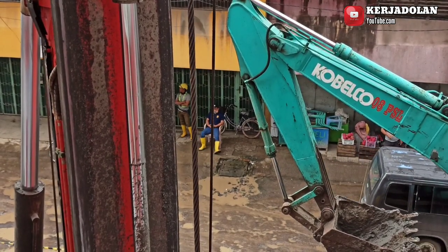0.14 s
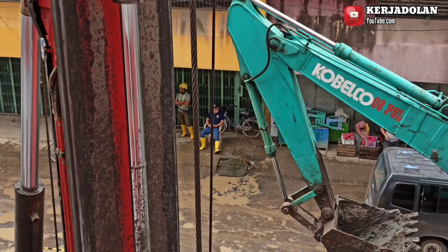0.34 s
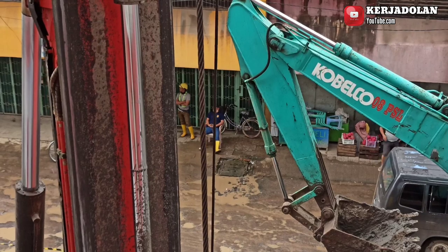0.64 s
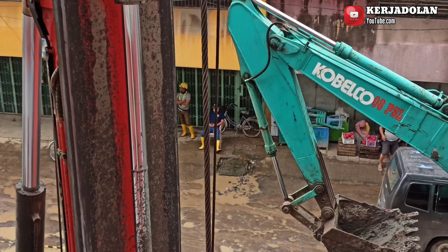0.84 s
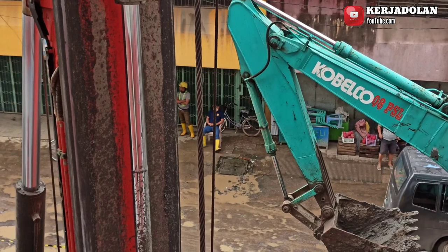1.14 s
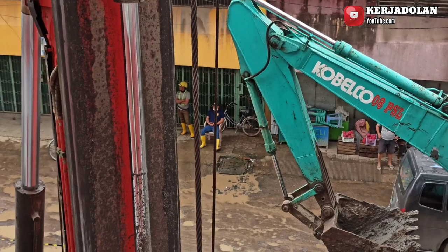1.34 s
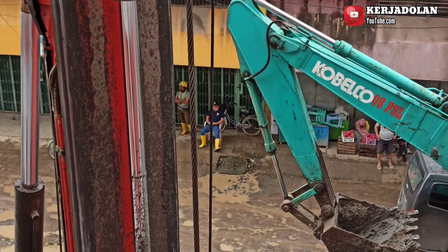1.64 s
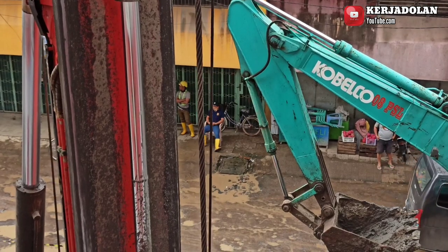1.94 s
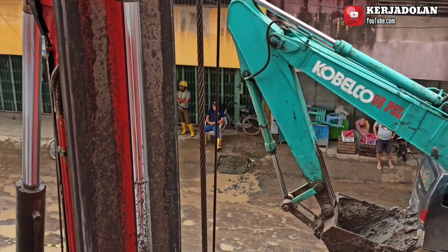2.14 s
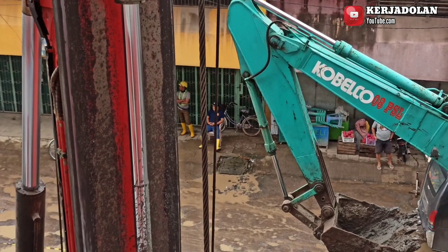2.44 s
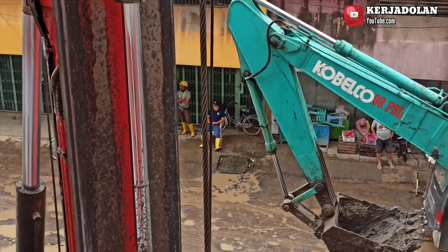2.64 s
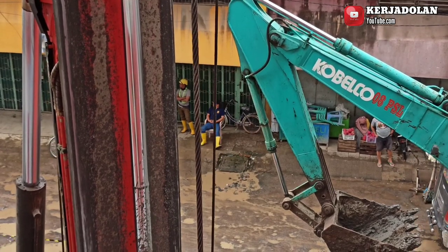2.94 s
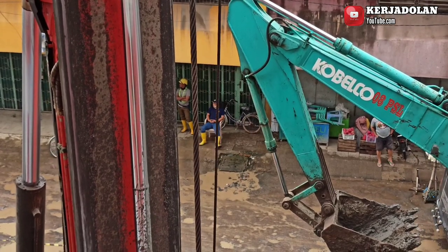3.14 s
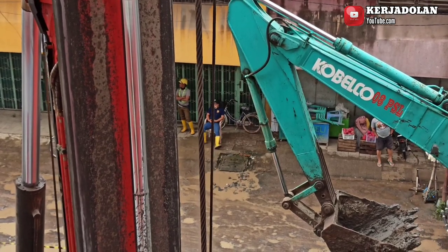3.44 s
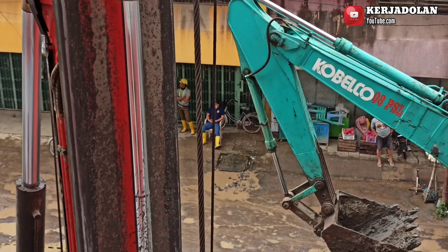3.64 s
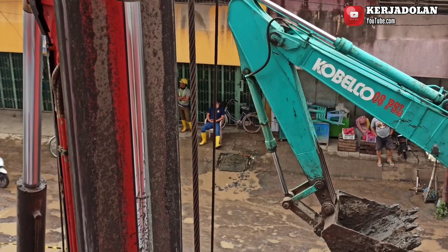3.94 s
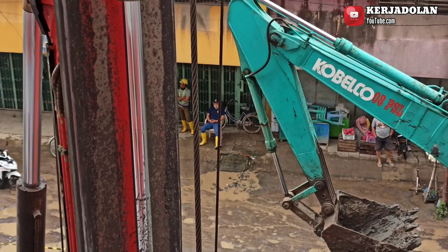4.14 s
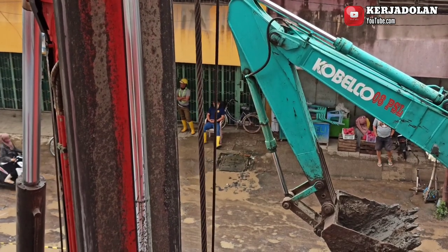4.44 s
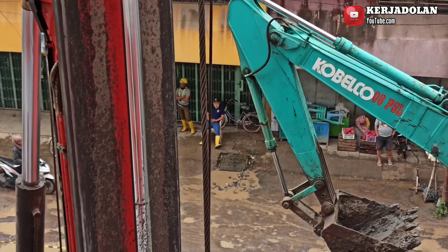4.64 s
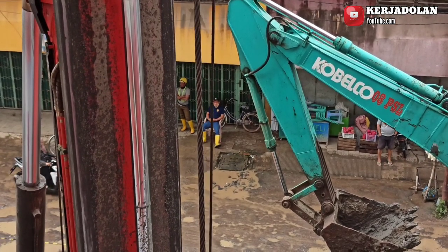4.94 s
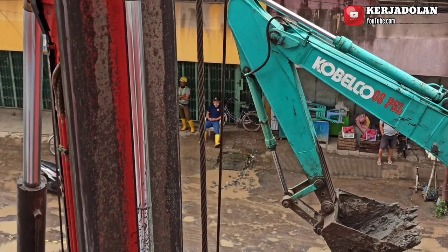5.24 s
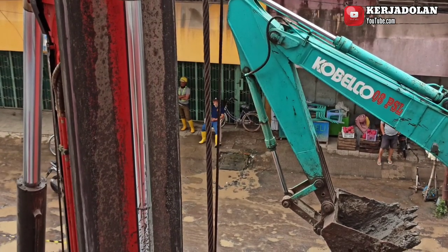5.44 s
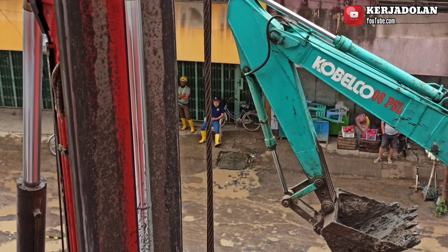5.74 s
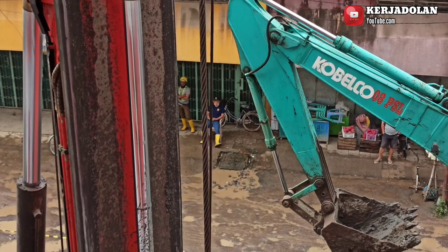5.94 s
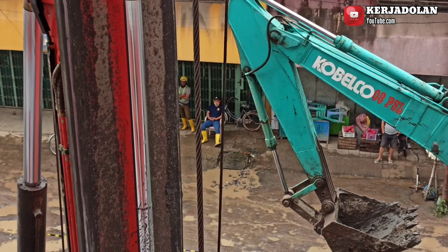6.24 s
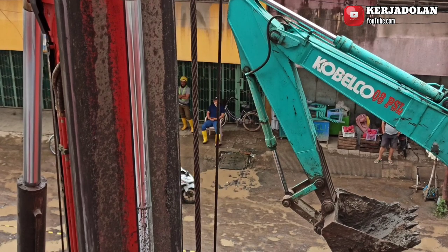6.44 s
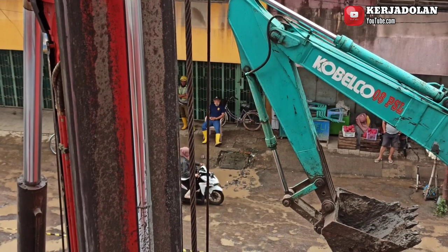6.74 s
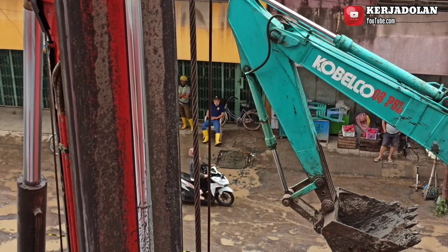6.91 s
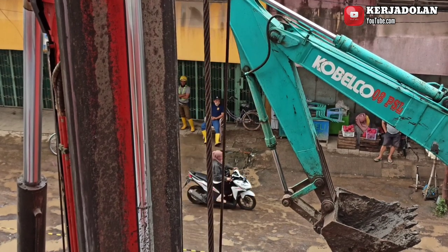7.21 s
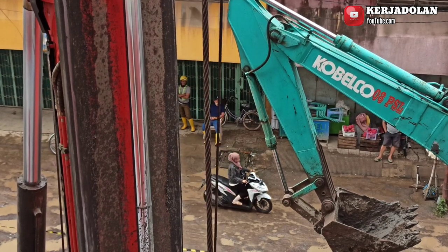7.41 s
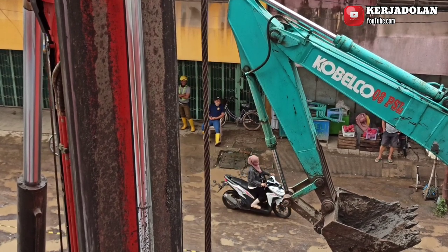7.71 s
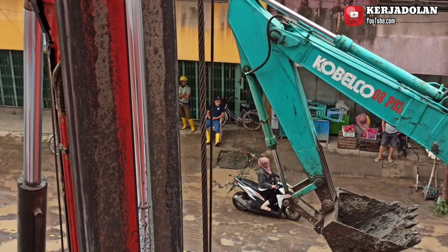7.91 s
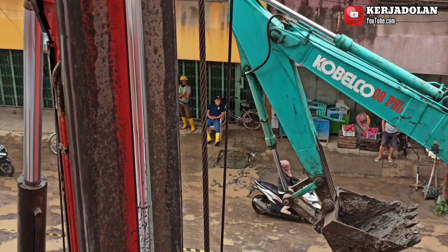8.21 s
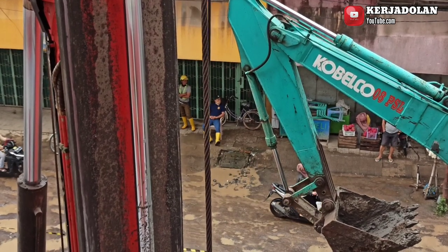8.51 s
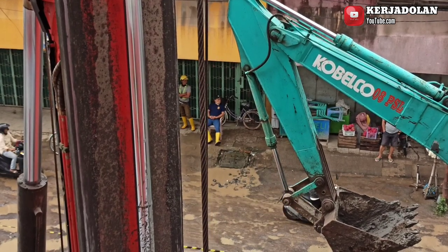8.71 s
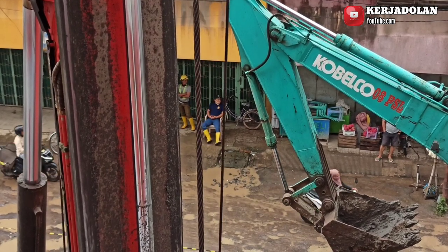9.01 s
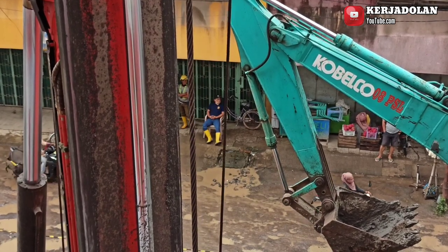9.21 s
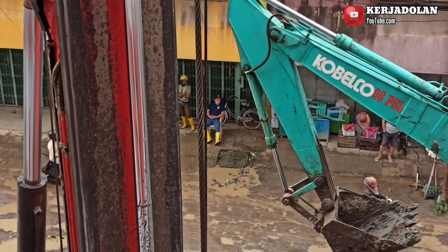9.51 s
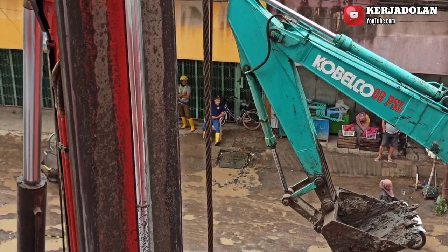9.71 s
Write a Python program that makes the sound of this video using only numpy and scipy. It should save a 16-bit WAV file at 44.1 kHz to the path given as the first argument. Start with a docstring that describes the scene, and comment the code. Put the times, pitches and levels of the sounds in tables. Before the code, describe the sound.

Close outdoor building site: a drilling rig runs without pause, a rough diesel hum and broad hissing roar under a wavering mechanical whine. Loose steel links chink, mostly in the first three seconds. The whine sags in pitch by four seconds, swells strongly at moments, then gradually climbs while engines drone past. The nearby microphone sounds dense and compressed, with thin deep bass.

```python
"""A drilling rig works close by on a building site. At first its shaft turns fast: the drive whines in
multiples of the shaft speed over a diesel hum and a roar of filtered noise, two engines drone past on
the road, and steel links chink, most often in the first three seconds. By four seconds the shaft sags
under load, with the whine swelling strongly at times; then it slowly recovers while more engines pass.
All along, a gain control turns the loud moments down."""
import sys
import numpy as np
from scipy import signal
from scipy.io import wavfile
from scipy.ndimage import uniform_filter1d

SR = 44100
rng = np.random.default_rng(int(sys.argv[2]) if len(sys.argv) > 2 else 0)


def bounce(signal):
    """Save signal as a 16-bit WAV file at the path given by the first command-line argument."""
    frames = np.transpose(np.atleast_2d(signal))
    limited = np.clip(frames, -1, 1)
    pcm = np.round(limited * 32767).astype(np.int16)
    wavfile.write(sys.argv[1], SR, pcm)


N = 434826  # length in samples


def gain_of(db):
    """Turns decibels into an amplitude factor."""
    return 10 ** (np.asarray(db) / 20)


def evened(x):
    """Scales a signal to an rms (average size) of 1."""
    return x / np.sqrt(np.mean(abs(x) ** 2) + 1e-20)


def read(points, hz):
    """Reads a spectrum table along a logarithmic frequency axis."""
    f, value = np.transpose(points)
    return np.interp(np.log(hz + 1), np.log(f + 1), value)


def played(rows, t):
    """Reads each column of a time table at the times t."""
    s, *columns = np.transpose(rows)
    return [np.interp(t, s, column) for column in columns]


def drift(hz):
    """Complex noise of rms 1, low-passed at hz so that it wanders slowly."""
    hold = 64  # each value lasts this many samples
    steps = N // hold + 2
    z = rng.standard_normal(steps) + 1j * rng.standard_normal(steps)
    z = evened(signal.lfilter([1], [1, -np.exp(-2 * np.pi * hz * hold / SR)], z))
    return np.repeat(z, hold)[:N]


def wander(hz, smooth):
    """A real drift of rms 1, averaged over a number of samples to round off its steps."""
    return evened(uniform_filter1d(drift(hz).real, smooth))


def tone(turns, rough, hz, apart=.3):
    """A tone for the left and right ports; the rough share wavers, and an extra part is opposite at each."""
    rough = np.clip(rough, 0, 1)
    spin = np.sqrt(2) * np.exp(2j * np.pi * turns)
    shared = ((np.sqrt(1 - rough) + np.sqrt(rough) * drift(hz)) * spin).real
    return shared + [[apart], [-apart]] * (drift(hz) * spin).real


# speed of the drive shaft as it sags under load and recovers: (t/s, turns per s)
SHAFT = [(0.0, 37.43), (0.35, 36.8), (0.8, 36.8), (1.2, 37.0), (2.0, 35.7), (2.6, 35.4), (2.9, 34.7),
         (3.32, 34.65), (3.45, 33.3), (3.6, 32.2), (3.8, 31.8), (3.9, 31.15), (4.3, 30.75), (4.5, 31.35),
         (4.7, 31.45), (5.0, 31.15), (5.6, 31.48), (7.08, 31.75), (7.25, 32.3), (7.6, 32.75), (8.0, 32.84),
         (8.12, 33.5), (8.45, 34.1), (8.7, 34.5), (8.92, 34.35), (9.1, 35.15), (9.5, 34.9), (9.86, 35.24)]
# whining orders, as multiples of the shaft speed
WHINE_ORDERS = 11, 11.5, 21, 22, 23, 24, 25
# basic level of each whining order: (level/dB)
WHINE_DB = -34.5, -39, -39.5, -33, -32, -33.5, -38
# housing resonances that change the orders sliding through them: (f/Hz, width/Hz, lift/dB)
HOUSING = [(437, 69, 7.5), (743, 51, 8.5), (830, 8.6, -1.5)]
# brief swells of one order: (t/s at the top, rise and fall time/s, order, level/dB)
SWELLS = [(0.26, 0.2, 11, -35), (0.52, 0.14, 11, -27), (0.91, .08, 11, -24), (.18, .1, 23, -28),
          (0.37, 0.12, 23, -25), (0.614, 0.18, 23, -23), (.1, .15, 11.5, -26), (.4, .15, 11.5, -28),
          (1.22, 0.2, 11.5, -25), (1.28, 0.2, 23, -26), (1.51, 0.18, 11, -27), (1.68, 0.3, 23, -24.5),
          (1.7, 0.064, 11, -21), (2.634, .15, 22, -32), (2.632, .12, 23, -26), (2.868, 0.091, 11, -22),
          (3.1, 0.14, 23, -26), (3.752, 0.12, 23, -28), (4.12, 0.16, 22, -16), (3.92, .2, 22, -17),
          (4.32, .12, 22, -25), (2.91, .22, 22, -23), (3.17, 0.21, 11, -25.5), (3.45, .15, 22, -27),
          (4.65, 0.21, 23, -17.5), (4.65, 0.36, 24, -24), (5.27, 0.33, 24, -22), (5.95, 0.27, 23, -23),
          (5.85, 0.28, 24, -24), (6.298, 0.18, 23, -14.5), (6.75, 0.081, 23, -32), (7.1, 0.24, 23, -22),
          (7.832, 0.18, 22, -19.5), (7.95, 0.15, 23, -21), (8.13, .09, 23, -24), (8.45, 0.15, 23, -25),
          (8.68, .1, 23, -25), (8.62, .12, 24, -27), (8.08, .1, 25, -29), (6.8, .15, 24, -28),
          (6.9, 0.092, 22, -25), (7.7, 0.15, 11, -29), (8.18, 0.36, 11, -28), (5.6, 0.2, 22, -27),
          (4.8, .12, 22, -29), (6.3, 0.13, 24, -30), (8.877, 0.12, 11, -27), (9.1, 0.12, 22, -21),
          (8.9, .1, 22, -25), (9.4, .15, 22, -27), (9.18, .12, 24, -28), (9.248, 0.094, 11, -34),
          (9.67, 0.13, 11.5, -29)]
# brief dips of the whine: (t/s at the lowest, fall and rise time/s, change/dB)
DIPS = [(4.05, .3, -4), (5.07, .08, -5), (5.7, .06, -2.5), (6.55, 0.09, -3), (7.47, 0.09, -2),
        (8.25, 0.12, -2)]
LOADED_TURNS_PER_S = 31.3  # shaft speed under load
WAVER_TURNS_PER_S = .045  # unsteadiness of the shaft speed
ROUGH_LOADED, ROUGH_PER_TURN = .32, .012  # the whine gets rougher as the shaft speeds up
FADING_DB, FADING_PER_S = 1.5, 5  # each order fades in and out by itself


def drive(t):
    """The shaft sounds at multiples (orders) of its speed; housing resonances lift some of them."""
    speed = played(SHAFT, t)[0] + WAVER_TURNS_PER_S * wander(3, 3000)
    turns = np.cumsum(speed) / SR
    rough = ROUGH_LOADED + ROUGH_PER_TURN * (speed - LOADED_TURNS_PER_S)
    dip_db = sum(db * np.exp(-((t - s) / length) ** 2) for s, length, db in DIPS)
    out = 0
    for k, db in zip(WHINE_ORDERS, WHINE_DB):
        lift_db = sum(top_db * np.exp(-.5 * ((k * speed - hz) / width) ** 2) for hz, width, top_db in HOUSING)
        size = gain_of(db + lift_db)
        for s, length, order, swell_db in SWELLS:
            if abs(order - k) < .25:  # this swell belongs to this order
                part = slice(max(round((s - length) * SR), 0), round((s + length) * SR))
                size[part] += gain_of(swell_db) * np.cos(np.pi / 2 * (t[part] - s) / length) ** 2
        size *= gain_of(dip_db + FADING_DB * wander(FADING_PER_S, 2000))
        out = out + size * tone(k * turns, rough, 6)
    return out


def gear_chatter(t):
    """Gear chatter smears a rapidly wavering band around the 23rd order of the shaft."""
    mesh_hz = 23 * played(SHAFT, t)[0]
    return gain_of(-23.0) * tone(np.cumsum(mesh_hz) / SR, 0.84, 56)


WANDER_HZ = 17  # the hump of each cluster strays up and down
CHATTER_DB, CHATTER_PER_S = 1.58, 4.6  # each cluster comes in bursts


def cluster(t, centre_hz, level_db, first, count, width_hz, rough):
    """A comb of unsteady shaft orders, strongest where they lie under a hump around centre_hz."""
    speed = played(SHAFT, t)[0]
    turns = np.cumsum(speed) / SR
    strays = WANDER_HZ * wander(4, 2500)
    out, power = 0, 1e-9
    for k in range(first, first + count):
        hump = np.exp(-.5 * ((k * speed - centre_hz - strays) / width_hz) ** 2)
        out = out + hump * tone(k * turns, rough, 6, apart=.5)
        power = power + hump ** 2
    bursts = wander(CHATTER_PER_S, 1500)
    return gain_of(level_db + CHATTER_DB * bursts) * out / np.sqrt(power)


# middle of the hump of the highest cluster: (t/s, f/Hz)
HIGH_HUMP = [(0, 2480), (2.0, 2410), (3.2, 2390), (3.5, 2280), (3.9, 2170), (4.6, 2230), (5.6, 2190),
             (6.5, 2234), (7.6, 2234), (8.0, 2260), (8.3, 2350), (9.0, 2315), (9.3, 2360), (9.86, 2360)]
# levels around which the clusters burst: (t/s, middle level/dB, low level/dB, high level/dB)
CLUSTER_LEVEL = [(0, -33, -30, -35), (.65, -31, -27.5, -38), (1.1, -34, -31, -40), (1.4, -34, -31, -42),
                 (2.2, -33.5, -29, -34), (2.9, -31.5, -30, -34), (3.4, -32.5, -31.5, -29.5),
                 (4.1, -33, -27.5, -36), (5.0, -34.5, -29, -33.5), (5.6, -33.5, -31.5, -36),
                 (6.3, -35, -32, -33.5), (6.6, -31, -27.5, -34), (7.1, -35, -30.5, -31),
                 (7.6, -33.5, -28.5, -27.5), (8.2, -29.5, -29, -28), (8.4, -32.5, -29, -34),
                 (8.75, -29, -30.5, -34), (8.95, -26, -28, -26.5), (9.12, -35, -32, -35.5),
                 (9.3, -28, -33, -26), (9.45, -31.5, -31, -35), (9.86, -31, -30, -35)]
MIDDLE_HZ = 1148
LOW_HZ, LOW_HZ_PER_TURN = 1446, 38.2  # centre at the loaded speed, and its shift per extra turn per s


def clusters(t):
    """Three combs of orders: one hump stays near one pitch, one follows the shaft, one follows its table."""
    spare = played(SHAFT, t)[0] - LOADED_TURNS_PER_S
    low_hz = LOW_HZ + LOW_HZ_PER_TURN * spare
    high_hz = played(HIGH_HUMP, t)[0]
    middle_db, low_db, high_db = played(CLUSTER_LEVEL, t)
    middle = cluster(t, MIDDLE_HZ, middle_db, first=31, count=7, width_hz=60, rough=0.79)
    low = cluster(t, low_hz, low_db, first=42, count=7, width_hz=46, rough=0.78)
    high = cluster(t, high_hz, high_db, first=62, count=14, width_hz=44, rough=0.82)
    return middle + low + high


# base level of the diesel, to which each order adds its own: (t/s, level/dB)
DIESEL_LEVEL = [(0, -41), (.5, -24), (.75, -30.5), (1.0, -25), (1.5, -26.5), (2.0, -30.5), (3.0, -34),
                (4.2, -27), (4.7, -35.5), (6.0, -26.5), (6.9, -32.5), (7.6, -37), (8.7, -25.5), (9.0, -28),
                (9.86, -30.5)]
DIESEL_HZ, HUNT_HZ = 194.3, .7  # second firing order, and its wander from the governor


def diesel(t):
    """The engine hums at multiples of its firing rate; the second stands out. Also counts the firings."""
    firings_per_s = (DIESEL_HZ + HUNT_HZ * wander(1, 8000)) / 2
    firings = np.cumsum(firings_per_s) / SR
    orders = [(1, -13.0), (2, 1.0), (3, -9.0), (4, -12.5)]  # (multiple, level/dB)
    hum = sum(gain_of(db) * tone(k * firings, .55, 7) for k, db in orders)
    return firings, gain_of(played(DIESEL_LEVEL, t)[0]) * hum


# faint wavering hums of fixed pitch: (f/Hz, level/dB)
DRONES = [(253, -37.5), (280, -37)]


def drones(t):
    """Faint hums keep their pitch while their size and phase waver."""
    return sum(gain_of(db) * tone(hz * t, .75, 6) for hz, db in DRONES)


# how alike the noise is at the left and right ports: (f/Hz, likeness where 1 is the same)
SAME = [(60, 0.76), (130, 0.93), (290, 1), (640, 0.86), (1410, 0.017), (3100, 0.5), (6820, 0),
        (15000, -0.0)]
# how the noise leans to one side: (f/Hz, left minus right level/dB)
LEAN = [(60, 1.5), (180, 0), (550, 0.5), (1650, -2.5), (4970, -1), (15000, -4.5)]


def noise(spectrum, size, patchy_db, flicker_db):
    """Noise of rms 1 from random short spectra, with drifting patches and a flicker shared by all bands."""
    frames, hz = 4 * N // size + 5, np.fft.rfftfreq(size, 1 / SR)
    a, b, c, d, patches = rng.standard_normal((frames, len(hz), 5)).T
    patches = evened(uniform_filter1d(uniform_filter1d(patches, 12, 0), 14, 1))
    flicker = evened(uniform_filter1d(rng.standard_normal(frames), 12))
    same = np.clip(read(SAME, hz), -1, 1)[:, None]
    left = a + 1j * b
    right = same * left + np.sqrt(1 - same ** 2) * (c + 1j * d)
    z = np.array([left, right])
    z *= gain_of(read(spectrum, hz)[:, None] + patchy_db * patches + flicker_db * flicker)
    z *= gain_of(np.multiply.outer([.5, -.5], read(LEAN, hz)))[:, :, None]
    return evened(signal.istft(z, nperseg=size, noverlap=3 * size // 4)[1][:, :N])


# level of the hiss, which the rumble and fizz follow: (t/s, level/dB)
ROAR = [(0, -22.5), (1.15, -22.5), (1.6, -22), (2.4, -22), (3.3, -23), (3.9, -21.5), (4.04, -25.5),
        (4.25, -22.5), (4.9, -23), (5.0, -22), (5.12, -21.5), (5.3, -23), (6.15, -24), (6.35, -25.5),
        (6.55, -22.5), (6.85, -23), (7.5, -23), (7.62, -23.5), (8.0, -23.5), (8.6, -23.5), (8.9, -22),
        (9.2, -23.5), (9.86, -22)]
# shape of the rumble's spectrum: (f/Hz, relative level/dB per Hz)
RUMBLE = [(12, -69), (20, -47), (32, -30), (85, -11.5), (123, -2.5), (194, -10), (223, -9), (265, -1),
          (339, -7), (390, -5.5), (613, -6), (743, -5.5), (1020, -11.5), (1150, -15.5), (1300, -34),
          (1690, -55), (2860, -120)]
# shape of the hiss's spectrum: (f/Hz, relative level/dB per Hz)
HISS = [(900, -24.5), (1250, -3.5), (1900, -5), (2900, -7.5), (4700, -8), (4850, -14.5), (6050, -14),
        (6200, -7.5), (7500, -9), (7750, -14), (8500, -16), (9500, -52)]
# shape of the top fizz's spectrum: (f/Hz, relative level/dB per Hz)
FIZZ = [(9000, -58), (11400, -3), (12900, -0.5), (13100, 0), (15500, 2)]
RUMBLE_OVER_DB, FIZZ_OVER_DB = 5.5, -10  # levels against the hiss
LUMPS_DB, LUMPS_PER_S = 0.7, 14  # uneven combustion makes rumble and hiss lumpy
KNOCK, FIZZ_KNOCK = .1, .2  # share by which single firings change the hiss and the top fizz


def roar(t, firings):
    """Housings and exhaust rumble; engines, fans and oil hiss, throbbing a little with each firing."""
    hiss_db = played(ROAR, t)[0]
    throb = 1 + .05 * np.cos(2 * np.pi * firings) + .06 * np.cos(4 * np.pi * firings)
    # each firing knocks with its own random strength, then dies away before the next
    strengths = rng.standard_normal(int(firings[-1]) + 2)
    uneven = strengths[firings.astype(int)] * np.exp(-(firings % 1) / .35)
    throb = throb + KNOCK * uneven
    lumps = gain_of(LUMPS_DB * wander(LUMPS_PER_S, 300))
    rumble = gain_of(hiss_db + RUMBLE_OVER_DB) * noise(RUMBLE, size=2048, patchy_db=1.0, flicker_db=.3)
    hiss = gain_of(hiss_db) * throb * noise(HISS, size=512, patchy_db=1.1, flicker_db=0.35)
    fizz = noise(FIZZ, size=256, patchy_db=1.3, flicker_db=-0.2)
    fizz = gain_of(hiss_db + FIZZ_OVER_DB) * (1 + FIZZ_KNOCK * uneven) * fizz
    return fizz + lumps * (rumble + hiss)


# engines passing on the road: (t/s at the closest, rise and fall time/s, f/Hz at the closest, level/dB)
PASSING = [(0.44, 0.5, 288.2, -26.5), (1.25, 0.16, 150, -24), (5.09, 0.73, 300.2, -31),
           (6.759, 0.53, 264.2, -24), (7.333, 0.19, 252, -27.5), (7.729, 0.99, 135.6, -30.5),
           (8.65, 0.28, 204.7, -30), (9.684, 0.34, 105.3, -27)]


def road(t):
    """Each passing engine swells, drops a little in pitch and fades."""
    out = 0
    for s, length, hz, db in PASSING:
        u = (t - s) / length
        pitch = hz * (1 - .02 * np.tanh(2 * u))
        out = out + gain_of(db) * np.exp(-2 * u ** 2) * tone(np.cumsum(pitch) / SR, 0.67, 5.6)
    return out


# ringing modes of the steel links: (f/Hz, level/dB, time to fade by 60 dB/s)
STEEL = [(2780, -3, .2), (2975, -3, .2), (3400, -2, .25), (3610, -4, .15), (3760, -4, .15), (3950, -2, .2),
         (4151, 0, .25), (4380, -2, .15), (4709, -2, .3), (6541, 0, .4), (6810, -1, .45), (7305, -2, .3),
         (7540, -3, .2)]
# the clearest chinks: (t/s, level/dB of the favoured mode, f/Hz of that mode)
CHINKS = [(.66, -25, 4151), (.85, -26, 4151), (.91, -29, 4380), (1.0, -24, 4380), (1.089, -25, 6541),
          (1.139, -24, 4151), (2.3, -25, 6541), (2.401, -22, 6541), (2.49, -29, 4151), (2.32, -32, 3400),
          (2.52, -26, 3400), (2.74, -30, 3400), (1.12, -31, 4380), (1.63, -26, 3610), (1, -31, 3610),
          (.74, -33, 3760), (2.6, -28, 3400), (2.54, -29, 4151), (2.46, -29, 4380), (2.95, -26, 3950),
          (3.08, -34, 3950), (3.2, -30, 3950), (.97, -28, 4151), (2.44, -32, 4709), (2.78, -29, 4709),
          (2.92, -28, 4709), (2.96, -24, 4709), (2.27, -27, 2780), (2.17, -28, 2975), (2.77, -28, 2975),
          (2.5, -31, 4709), (2.27, -29, 7540), (2.36, -29, 7540), (3.14, -29, 6541), (3.9, -28.5, 4151),
          (5.02, -33, 4151), (5.061, -25, 6810), (5.11, -28, 4380), (7.81, -28, 2975), (6.48, -28, 7305),
          (4.56, -28, 4380), (8.63, -27, 4151), (8.89, -27, 2975), (7.5, -30, 4151), (7.8, -28, 4151),
          (9.55, -37, 6541)]
BOUNCES, BOUNCE_S, BOUNCE_FADE_DB = 4, .08, 9  # bounces per blow, their time span and fade over it
SPLIT = .012  # largest distance of a twin mode, as a share of the frequency


def steel():
    """Loose links rattle faintly all the time; a hard blow mostly rings one mode and bounces a few times."""
    t, out = np.arange(SR // 2) / SR, np.zeros((2, N))
    for hz, db, t60 in STEEL:
        # faint rattle: about 14 random taps a second on each mode
        taps_db = -42.5 + 2.2 * np.minimum(rng.exponential(1, N), 3)
        blows = gain_of(taps_db) * (rng.random(N) < 14 / SR)
        for s, blow_db, near_hz in CHINKS:
            after = np.append(0, np.sort(rng.random(BOUNCES))) * BOUNCE_S
            other_db = 0 if hz == near_hz else 16  # the other modes ring this much softer
            size = gain_of(blow_db - db - other_db - BOUNCE_FADE_DB * after / BOUNCE_S)
            size *= size[0] / np.linalg.norm(size)  # the bounces share the energy of the blow
            blows[((s + after) * SR).astype(int)] += size * rng.choice([-1, 1], BOUNCES + 1)
        ring = gain_of(db - 60 * t / t60) * np.minimum(t / 0.006, 1) * np.exp(2j * np.pi * hz * t)
        # a close twin mode makes the ring beat
        ring *= 1 + .4 * np.exp(2j * np.pi * hz * rng.uniform(-SPLIT, SPLIT) * t)
        turn = np.array([[1], [1j]])  # the ports hear the modes a quarter cycle apart
        out += (turn * signal.oaconvolve(blows, ring)[:N]).real
    return out


def scene():
    """All machines together."""
    t = np.arange(N) / SR
    firings, hum = diesel(t)
    rig = drive(t) + gear_chatter(t) + clusters(t)
    return rig + hum + drones(t) + roar(t, firings) + road(t) + steel()


GAP_HZ, EDGE_HZ = (8600, 11520), 15650  # empty band in the treble, and top limit


def record(dry):
    """The deep bass is thin, loud moments are trimmed, and the treble has an empty band and a top limit."""
    # the rig is nearer the left port, so the right hears it 3 samples later
    dry = np.array([dry[0], np.roll(dry[1], 3)])
    dry = signal.sosfilt(signal.butter(3, 60, "high", fs=SR, output="sos"), dry)
    power_db = 10 * np.log10(abs(uniform_filter1d((dry ** 2).mean(0), 500)) + 1e-12)
    over_db = uniform_filter1d(np.maximum(power_db + 13.5, 0), 700)
    # gain control, then soft rounding of the peaks
    trimmed = np.tanh(dry * gain_of(1.0 - 0.39 * over_db) / 1.135) * 1.132
    taps = signal.firwin(1023, [*GAP_HZ, EDGE_HZ], window=("kaiser", 8), fs=SR)
    return signal.oaconvolve(trimmed, taps[None], "same")


dry = scene()
out = record(dry)
bounce(out)
```